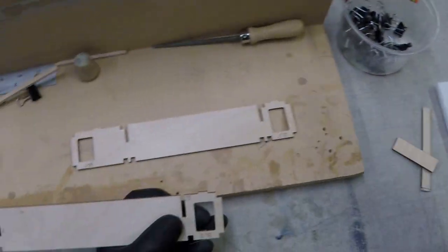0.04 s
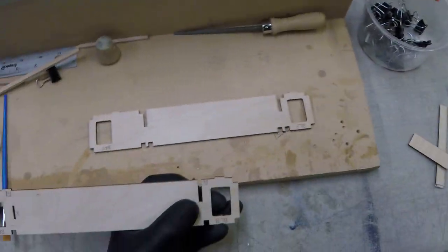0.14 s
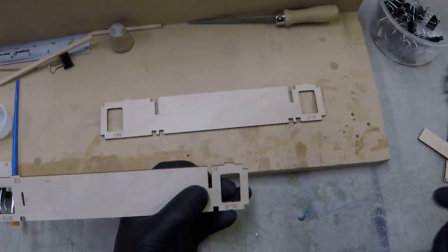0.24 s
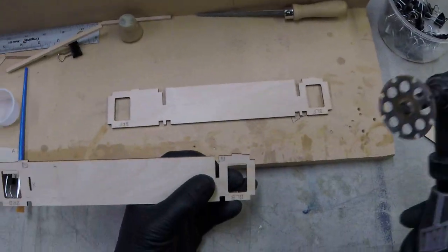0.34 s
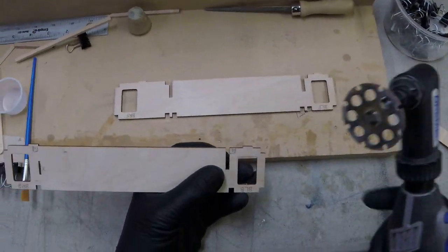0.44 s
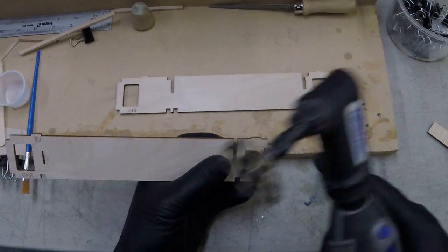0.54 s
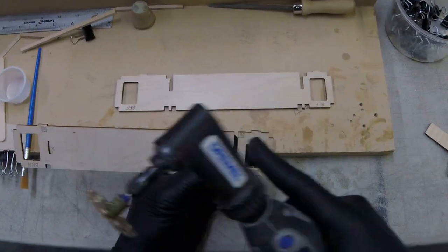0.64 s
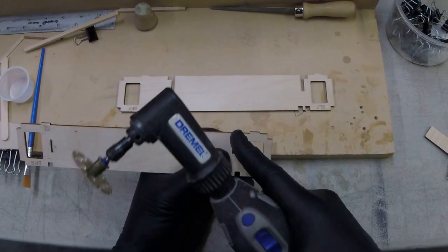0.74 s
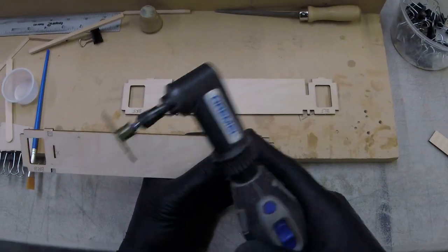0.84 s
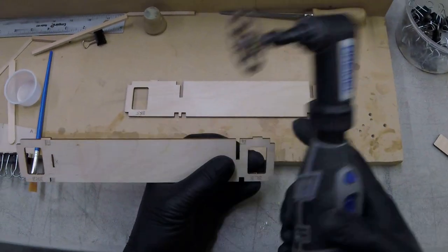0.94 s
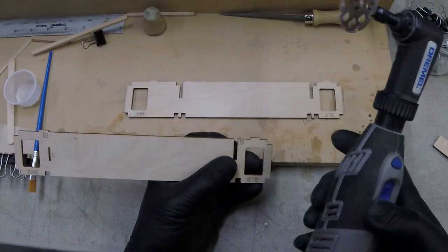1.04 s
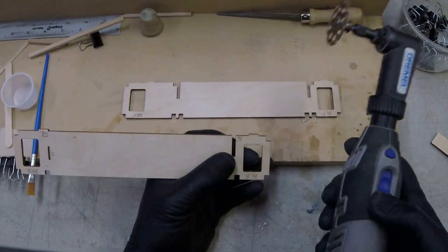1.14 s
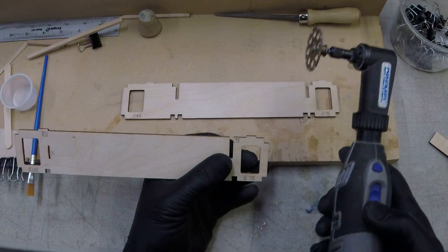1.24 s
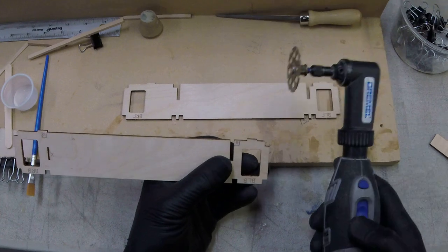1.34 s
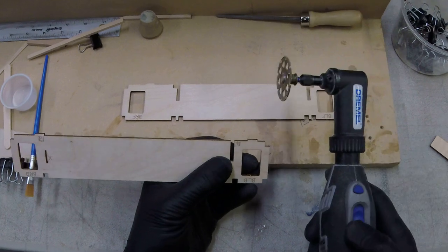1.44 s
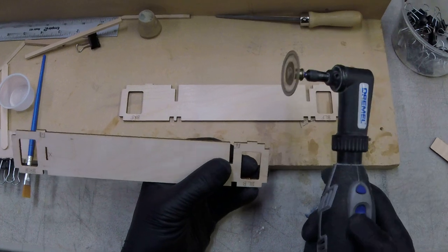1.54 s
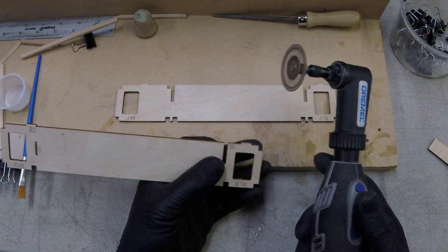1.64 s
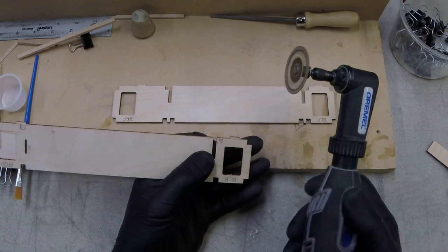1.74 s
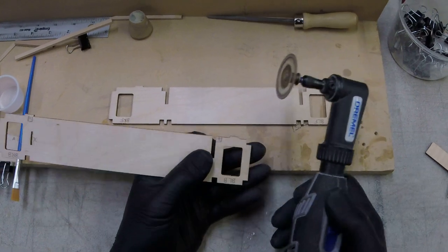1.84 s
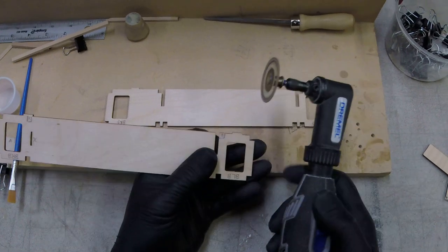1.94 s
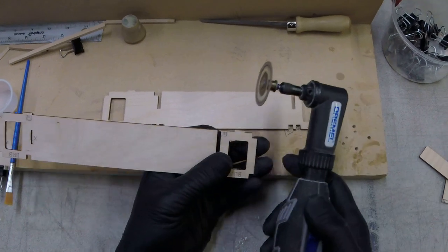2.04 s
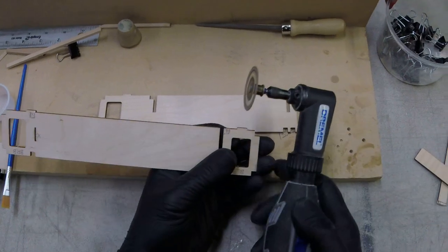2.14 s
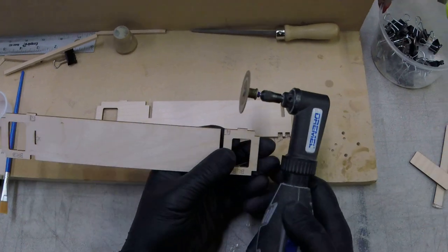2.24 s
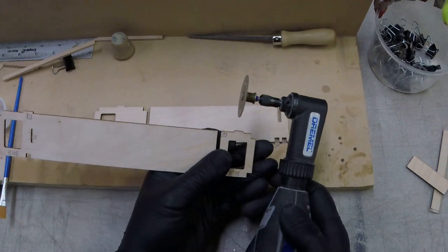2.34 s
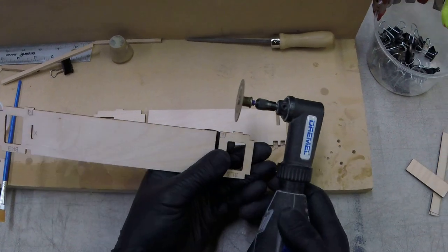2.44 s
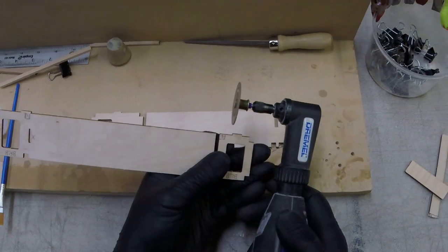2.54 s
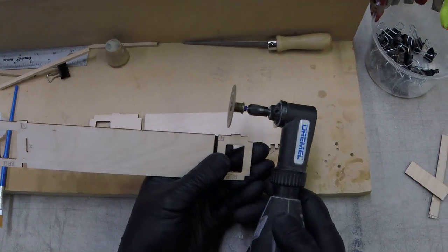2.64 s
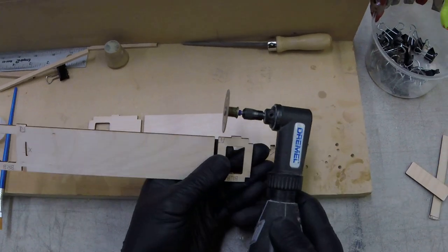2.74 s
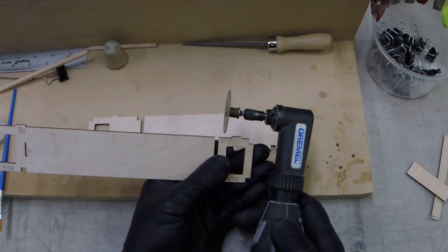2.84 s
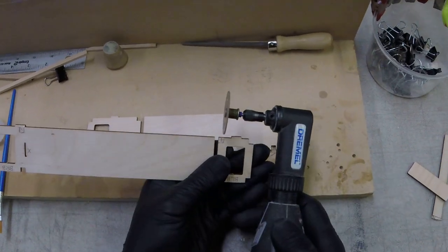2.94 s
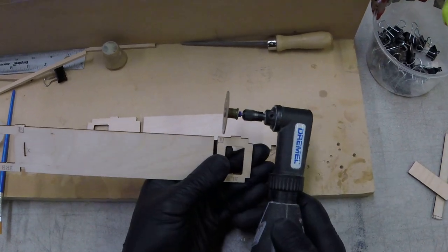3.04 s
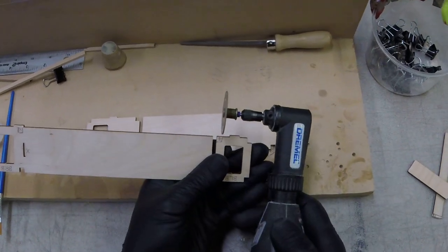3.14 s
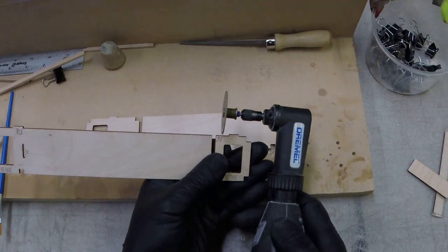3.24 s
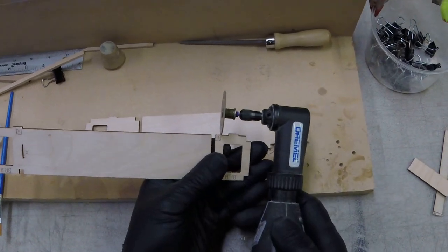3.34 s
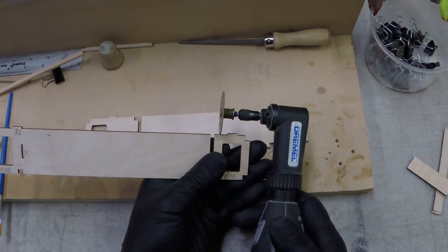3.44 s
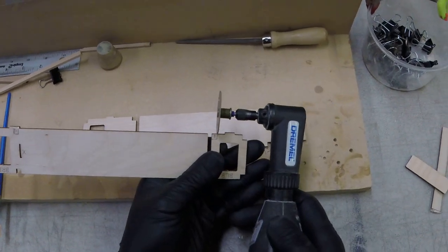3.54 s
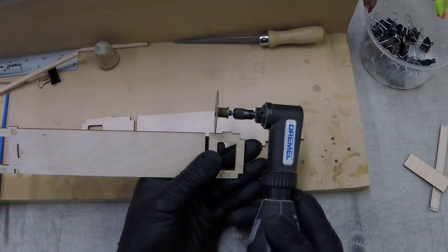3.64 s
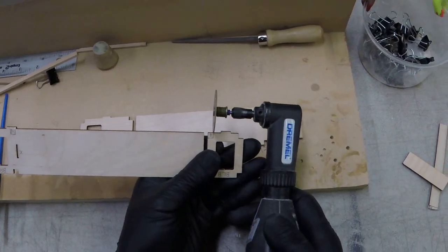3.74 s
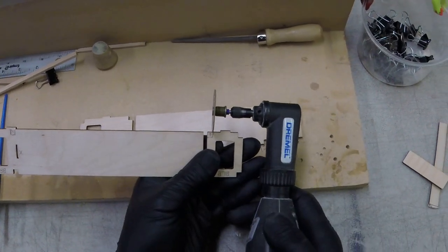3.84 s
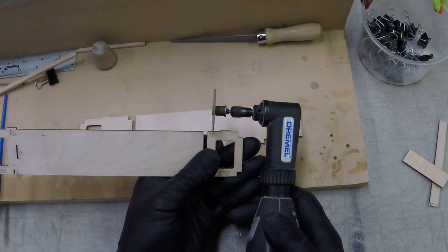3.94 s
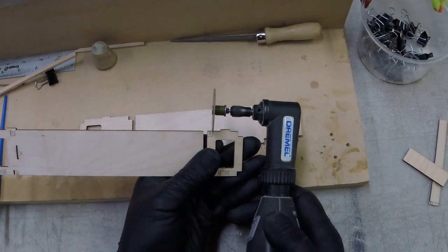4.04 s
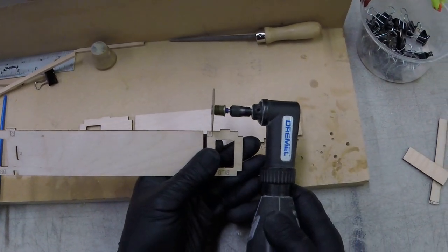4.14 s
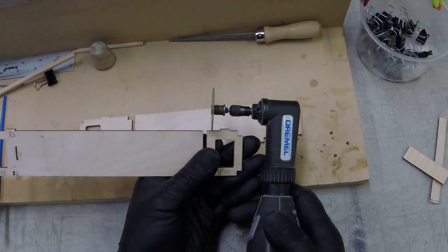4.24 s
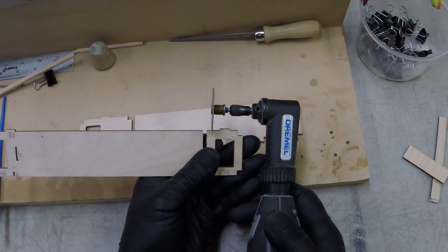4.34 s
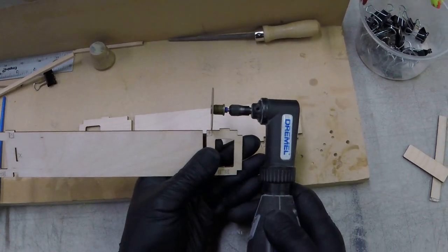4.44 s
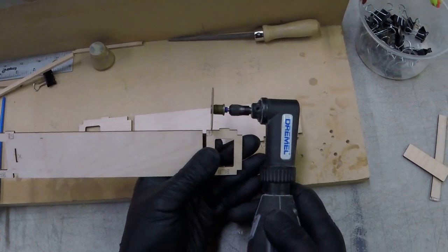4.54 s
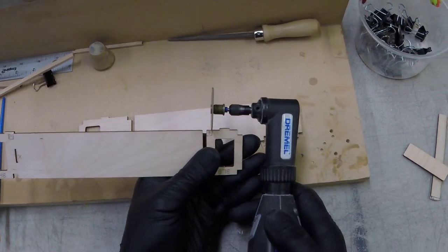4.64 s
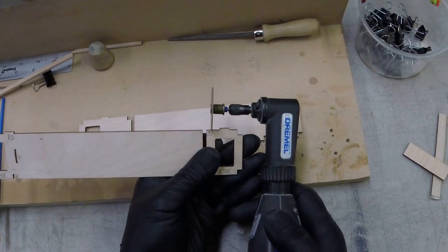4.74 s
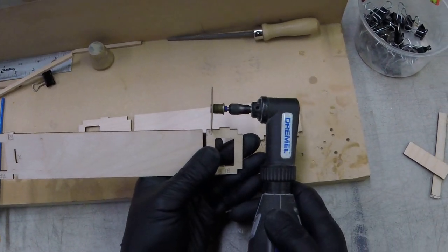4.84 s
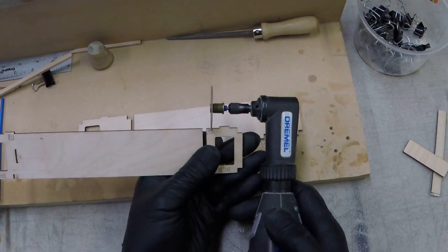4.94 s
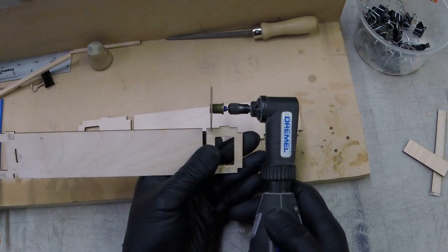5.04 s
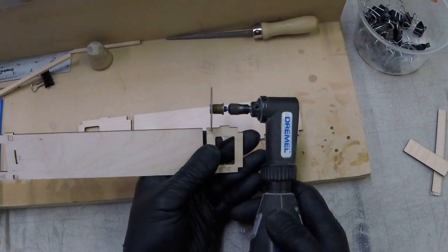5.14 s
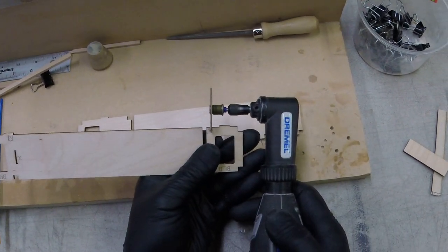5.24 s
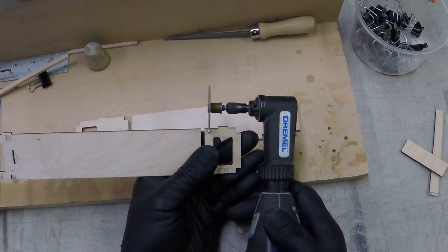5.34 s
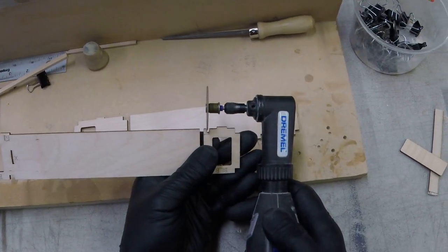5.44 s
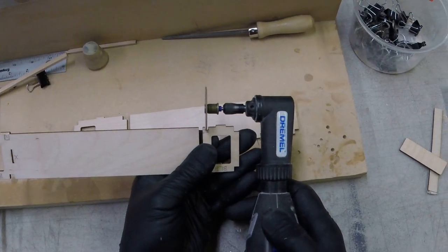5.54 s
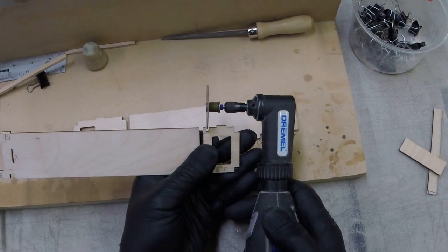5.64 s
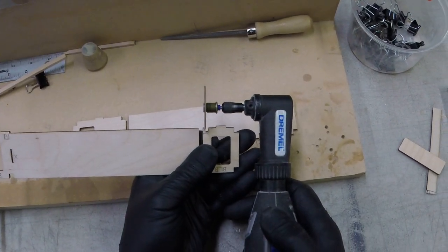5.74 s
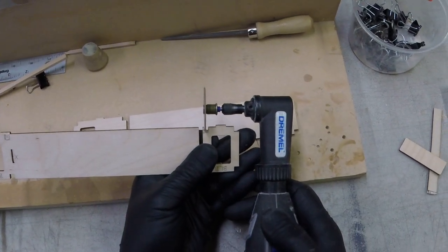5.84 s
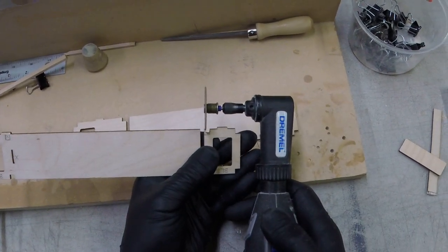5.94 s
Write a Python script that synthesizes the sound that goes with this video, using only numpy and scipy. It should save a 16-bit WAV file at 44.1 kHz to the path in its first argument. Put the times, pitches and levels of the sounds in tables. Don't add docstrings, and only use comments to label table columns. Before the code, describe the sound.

Close in a workshop with a low ventilation drone, gloves and sleeve rustle softly. A plastic slider switch snaps sharply and a small rotary tool winds up with a rising gear whine, settling into a steady rattling buzz and hum. It touches wood lightly, then bites harder. Suddenly everything jumps two octaves, sped up fourfold, as the disc cuts in shrill, wavering strokes. Single close microphone, thin bass, essentially mono.

```python
import sys
import numpy as np
from scipy import signal
from scipy.fft import rfft, irfft, next_fast_len
from scipy.io import wavfile
from scipy.ndimage import uniform_filter1d

SR = 44100
rng = np.random.default_rng(int(sys.argv[2]) if len(sys.argv) > 2 else 0)


def int16_out(signal):
    q = np.round(np.clip(np.atleast_2d(signal).T, -1, 1) * 32767)
    wavfile.write(sys.argv[1], SR, q.astype(np.int16))


def linear_from_db(decibels):
    return 10 ** (np.asarray(decibels, float) / 20)


N = 264159
T = np.arange(N) / SR

CUT_S = 4.8705
TEETH = 17
FULL_HZ = 288
PULL_ENDS_S = 1.903

# [from/s, to/s, level/dB, growth/(dB/s), edge/s, press on the disc/0-1]
KNOCKS = [
    (1.908, 2.88, -24.5, -1.5, .12, 0.44),
    (3.968, 4.18, -31, 1, 0.041, 0.47),
    (4.507, 4.896, -29.5, 16, 0.051, 0.93),
]


def unit(x):
    return x / np.sqrt(np.mean(x ** 2) + 1e-20)


def curves(rows):
    s, *columns = np.transpose(rows)
    return [np.interp(T, s, column) for column in columns]


def wobble(rate):
    knots = int(N * rate / SR) + 2
    return np.interp(T * rate, np.arange(knots), rng.standard_normal(knots))


def spell(start, end, edge):
    return np.clip(np.minimum(T - start, end - T) / edge + .5, 0, 1)


def bump(s, spread):
    return np.exp(-((T - s) / spread) ** 2)


def filtered(x, response):
    size = 2 * next_fast_len(N // 2 + 4096)
    return irfft(rfft(x, size) * response(np.fft.rfftfreq(size, 1 / SR)), size)[:N]


def colour(points, pace=1):
    f, db = np.transpose(points)

    def response(hz):
        gain = linear_from_db(np.interp(np.log(hz + 1), np.log(f * pace), db))
        cepstrum = irfft(np.log(gain + 1e-6))
        cepstrum[1:len(cepstrum) // 2] *= 2
        cepstrum[len(cepstrum) // 2 + 1:] = 0
        return np.exp(rfft(cepstrum))
    return response


def resonances(modes):
    def response(hz):
        total = 0
        for k, (centre, width, db) in enumerate(modes):
            damping = 1j * hz * width
            total = total + (-1) ** k * linear_from_db(db) * damping / (centre * centre - hz * hz + damping)
        return total
    return response


def band(x, lo_hz, hi_hz):
    return unit(filtered(x, lambda hz: 1 / np.sqrt((1 + (lo_hz / (hz + 1)) ** 8) * (1 + (hz / hi_hz) ** 8))))


def shop(pace, line_db):
    # [f/Hz, level/dB per Hz]
    air_colour = [(15, -94), (90, -45), (118, -19.5), (135, -11), (172, -3), (301, -7.5), (394, -13.5),
                  (604, -9), (1150, -21.5), (1630, -21.5), (3540, -34), (5200, -33.5), (7000, -36),
                  (15000, -46.5)]
    # [f/Hz, rms level/dB]
    fan_lines = [(172.3, -51.5), (344.5, -57), (430.7, -66), (511.4, -72), (608.3, -58.5), (694.4, -67),
                 (769.8, -88), (866.7, -84.5)]
    air = unit(filtered(rng.standard_normal(N), colour(air_colour, pace)))
    hum = 0
    for hz, db in fan_lines:
        phase = 2 * np.pi * hz * pace * T + 0.42 * wobble(9 * pace)
        hum = hum + linear_from_db(db + line_db + 2.14 * wobble(13 * pace)) * np.sin(phase)
    return linear_from_db(-48.5 + 0.95 * wobble(3 * pace)) * air + hum


def rumble():
    bass = colour([(20, 2), (60, -1.5), (110, -8.5), (400, -3), (700, -34)])
    return linear_from_db(-76.5 + 4.8 * wobble(4.5)) * unit(filtered(rng.standard_normal(N), bass))


def sleeve_rustle():
    # [t/s, level/dB, spread/s]
    rubs = [
        (.12, -64, 0.025),
        (.31, -72, .03),
        (.57, -62.5, 0.056),
        (.93, -64, .05),
        (1.18, -70, 0.045),
        (1.28, -62, 0.02),
        (1.39, -58, 0.023),
    ]
    # [f/Hz, level/dB per Hz]
    cloth = [(1200, -120), (2000, 2), (4200, -4), (5400, 2), (7000, -8), (10500, -8), (12500, -120)]
    rustle = unit(filtered(rng.standard_normal(N) * linear_from_db(3 * wobble(120)), colour(cloth)))
    return rustle * sum(linear_from_db(db) * np.exp(-.5 * ((T - s) / spread) ** 2) for s, db, spread in rubs)


def slider_switch():
    # [t/s, peak level/dB, t60/s]
    snaps = [
        (.897, -52, .006),
        (.965, -53, .006),
        (1.479, -33, 0.0089),
        (1.4939, -19.5, 0.022),
        (1.5034, -19, 0.0075),
        (1.5061, -11, 0.017),
        (1.515, -23, 0.016),
    ]
    # [f/Hz, width/Hz, level/dB]
    shell = [(1700, 490, -2.5), (3260, 350, 0), (5200, 590, -0.5), (7540, 2800, -13), (10400, 1200, -16)]
    level = 0
    for s, db, t60 in snaps:
        attack = np.clip((T - s) / 0.0016 + 0.67, 0, 1) ** 2
        level = level + attack * linear_from_db(db + 8.0 - 60 * np.abs(T - s) / t60)
    return filtered(rng.standard_normal(N) * level, resonances(shell))


def tightness(turns, tight_db, turn_db, drift):
    luck = np.clip(rng.standard_normal((int(turns[-1]) + 2, 2)), -2, 2)[turns.astype(int)]
    binding = np.cos(2 * np.pi * (turns - .5 + drift * luck[:, 0]))
    return linear_from_db(tight_db * binding + turn_db * luck[:, 1])


def teeth(turns, casing, tight_db, turn_db, tooth_db, surge_db, surge_rate):
    bounces = 2.1
    hit = np.diff(np.floor(turns * TEETH * bounces), prepend=0) > 0
    blows = hit * rng.standard_normal(N) * linear_from_db(tooth_db * np.clip(rng.standard_normal(N), -2, 2))
    blows = blows * tightness(turns, tight_db, turn_db, drift=0.2) * linear_from_db(surge_db * wobble(surge_rate))
    return filtered(blows, casing)


def knock(turns, orders_db, flutter_db, rate, smear, chatter=0):
    total = 0
    for k, db in enumerate(orders_db):
        level = linear_from_db(db + (flutter_db * min(.2 + k / 14, 1) + 3 * chatter) * wobble(rate))
        blur = (smear * (k / 10) ** 2 + k / 4 * chatter) * wobble(rate * 8) + rng.normal()
        total = total + level * np.cos((k + 1) * 2 * np.pi * turns + blur)
    return total * np.sqrt(2)


def imbalance(turns, speed, extra_db, rate):
    # [shaft f/Hz, level/dB]
    handle = [(40, -79), (130, -65), (190, -54), (236, -41), (257, -47.5), (273, -53), (282, -44),
              (293, -42)]
    hz, db = np.transpose(handle)
    level = linear_from_db(np.interp(speed, hz, db) + extra_db + 0.37 * wobble(rate))
    return level * np.sqrt(2) * np.sin(2 * np.pi * turns + 0.4 * wobble(rate))


def bench(x, share):
    delay_s = .000775 + .000012 * wobble(8)
    return (x + share * np.interp(T - delay_s, T, x)) / np.sqrt(1 + share ** 2)


def gear_rattle(turns, speed):
    # [f/Hz, width/Hz, level/dB]
    casing = [(883, 700, -9.5), (1114, 270, 0.5), (1795, 505, -3.5), (2340, 520, -3.5), (3617, 510, 0.5),
              (4690, 270, -1), (5300, 317, 1), (7530, 1520, -12), (8590, 780, -9.5), (10280, 900, -13),
              (13200, 1100, -24)]
    pull = spell(0, PULL_ENDS_S + 0.038, 0.092)
    press = sum(spell(s, end, edge) * share for s, end, *_, edge, share in KNOCKS)
    mid_db = -27 + 1.5 * pull + 1 * press
    mid_db = mid_db + 3.5 * bump(2.41, 0.16) - 4.5 * bump(1.98, 0.11)
    dull_db = -31 + 2.5 * pull + 2.5 * press
    bright_db = -36.5 + 7 * pull + 5 * press
    gear = teeth(turns, resonances(casing), tight_db=2.5, turn_db=1.5, tooth_db=3.0, surge_db=0.5, surge_rate=70)
    gear = gear / np.sqrt(np.abs(uniform_filter1d(gear ** 2, SR // 5)) + 1e-20)
    rattle = linear_from_db(mid_db) * band(gear, 3090, 6360)
    rattle = rattle + linear_from_db(dull_db) * band(gear, 190, 2610)
    rattle = rattle + linear_from_db(bright_db) * bench(band(gear, 8600, 13200), .7 * pull)
    return rattle * (speed / FULL_HZ) ** 0.73 * linear_from_db(0.51 * wobble(12))


def gear_whine(turns, speed):
    # [f/Hz, width/Hz, level/dB]
    head = [(1190, 320, 1.5), (1860, 250, 7), (3030, 220, 4), (3810, 160, 8.5), (5300, 940, 2),
            (6400, 840, -6.5), (8650, 360, -6), (10400, 580, 0), (13600, 650, -17)]
    pace = speed / FULL_HZ
    scatter = pace * (.06 * wobble(300) + .24 * pace * wobble(2500))
    tooth = np.maximum.accumulate(np.floor(turns * TEETH + scatter))
    uneven = linear_from_db(14 * np.clip((pace - .2) / .25, 0, 1) * (tooth % 2) + 1.5 * wobble(1500))
    blows = (np.diff(tooth, prepend=0) > 0) * uneven * tightness(turns, tight_db=6, turn_db=2.0, drift=0.03)
    ring = filtered(blows, resonances(head))
    ring = filtered(ring, colour([(300, -36), (900, 2.5), (3000, 5), (15000, 6.0)]))
    ring = ring / np.sqrt(np.abs(uniform_filter1d(ring ** 2, SR // 12)) + 1e-12)
    past_pull = T - PULL_ENDS_S
    level_db = -23 + 12 * past_pull - 600 * np.maximum(1.54 - T, 0) - 170 * np.maximum(past_pull, 0)
    return linear_from_db(level_db) * ring


def shaft_knock(turns):
    # [multiple, level/dB]
    rising = [(1, -11), (2, -6.5), (3, -13.5), (4, -5.5), (5, -4), (6, -4), (7, -4), (8, -11), (9, -9.5),
              (10, -11), (11, -7), (12, -9), (13, -7), (14, -11), (15, -16), (16, -6), (17, -13), (18, -13),
              (19, -11), (20, -6), (21, -6), (22, -5), (23, 3), (24, -13)]
    # [multiple, level/dB]
    free = [(1, -26), (2, -13), (3, -7), (4, 1.5), (5, -5), (6, -6.5), (7, -5), (8, -10), (9, -8),
            (10, -22), (11, -21), (12, -6), (13, -21), (14, -31), (15, -23), (16, -29), (17, -27), (18, -6),
            (19, -4.5), (20, -2), (21, -8.5), (22, -6), (23, -31), (24, -6)]
    # [multiple, level/dB]
    touch = [(1, -12), (2, -13.5), (3, -5), (4, -4.5), (5, 0), (6, -1.5), (7, -7), (8, -8), (9, -7),
             (10, -15), (11, -9), (12, -8), (13, -14), (14, -21), (15, -12), (16, -12), (17, -1), (18, 0.5),
             (19, -1), (20, -5), (21, -10), (22, -17), (23, -19), (24, 5)]
    # [multiple, level/dB]
    biting = [(1, -15), (2, -16.5), (3, -3), (4, -7), (5, -4), (6, -6), (7, -6.5), (8, -8), (9, -9.5),
              (10, -14), (11, -7), (12, -8), (13, -27), (14, -26), (15, -23), (16, -19), (17, -14),
              (18, -3), (19, 2), (20, 0.5), (21, -3), (22, -10), (23, -30), (24, 6)]
    stages_s = [2.0, 2.2, 3.2, 3.6, 4.55, 4.75]
    orders_db = [-120]
    for k, rows in enumerate(list(zip(rising, free, touch, biting))[1:]):
        a, b, c, d = [db for _, db in rows]
        order_db = np.interp(T, stages_s, [a, b, b, c, c, d])
        if k == 10:
            order_db = order_db + 8 * bump(2.24, .06)
        orders_db.append(order_db - 2.5 * max(k - 18, 0))
    steady = sum(spell(s, end, edge) * linear_from_db(db + grow * (T - s)) for s, end, db, grow, edge, _ in KNOCKS)
    starts_s, settles_s = KNOCKS[0][:2]
    loose_db = np.maximum(-34.5 - 5.5 * np.abs(T - settles_s), -34.5 - 4)
    loose = (T > starts_s) * linear_from_db(loose_db)
    level = np.maximum(steady, loose * linear_from_db(3 * wobble(9))) * linear_from_db(-3)
    return level * knock(turns, orders_db, flutter_db=2.8, rate=20, smear=.5)


def tool():
    # [t/s, f/Hz]
    shaft = [(1.505, 20), (1.54, 45), (1.6, 76.5), (1.7, 124.5), (1.81, 175.5), (1.9, 231), (1.96, 248.5),
             (2.06, 261.5), (2.3, 269), (2.7, 275), (2.9, 276), (2.96, 281.5), (3.3, 289), (3.7, 291.5),
             (4.53, 292.5), (4.87, 276)]
    speed, = curves(shaft)
    turns = np.cumsum(speed * (T > shaft[0][0])) / SR
    running = np.clip((T - 1.514) / 0.0033, 0, 1)
    hum = imbalance(turns, speed, extra_db=0, rate=14)
    return running * (gear_rattle(turns, speed) + gear_whine(turns, speed) + hum) + shaft_knock(turns)


def gear_rattle_fast(turns, gaining, loss_db):
    # [f/Hz, level/dB per Hz]
    casing = [(710, -42), (1200, -30), (1830, -28), (2730, -20), (3400, -10.5), (4600, -4.5), (5570, -4.5),
              (7000, -5.5), (9500, -6), (11600, -9.5), (12600, 2), (14600, 3.5), (15900, 1)]
    freeing = np.clip(gaining, 0, 1.2)
    dull_db = -27.5 + 2.5 * freeing - loss_db
    bright_db = -28.5 - 4 * freeing - loss_db
    gear = teeth(turns, colour(casing), tight_db=0, turn_db=-0.5, tooth_db=1, surge_db=1.0, surge_rate=200)
    late = T > CUT_S
    rattle = linear_from_db(dull_db) * band(gear * late, 1000, 11500) + linear_from_db(bright_db) * band(gear * late, 10000, 18000)
    return np.sqrt(np.mean(late)) * rattle


def shaft_knock_fast(turns, loss_db, chatter):
    # [multiple, level/dB]
    first = [(1, -18), (2, -14), (3, -6.5), (4, -1), (5, -4.5), (6, -10), (7, -8.5), (8, -9), (9, -12.5),
             (10, -14.5), (11, -13), (12, -17), (13, -9), (14, -16), (15, -14)]
    # [multiple, level/dB]
    later = [(1, -14), (2, -12), (3, -8), (4, -1), (5, -5.5), (6, -10.5), (7, -7.5), (8, -12), (9, -12),
             (10, -16), (11, -18), (12, -9), (13, -7), (14, -8), (15, -11)]
    orders_db = [-120] + [np.where(T < 5.3, a, b) for (_, a), (_, b) in zip(first[1:], later[1:])]
    level = linear_from_db(-28 - loss_db - 16 * chatter * np.abs(wobble(140)))
    return level * knock(turns, orders_db, flutter_db=5.5, rate=30, smear=.78, chatter=np.clip(chatter, 0, 1))


def tool_fast():
    # [t/s, f/Hz]
    shaft = [(4.875, 1088), (4.92, 1052), (5.11, 998), (5.3, 980), (5.36, 1090), (5.44, 1176), (5.48, 1138),
             (5.525, 1058), (5.635, 1024), (5.7, 1112), (5.74, 1124), (5.8, 1035), (5.885, 1014),
             (5.96, 1100), (5.99, 1122)]
    # [from/s, to/s, knock loss/dB, chatter/0-1, rattle loss/dB]
    lifts = [
        (5.25, 5.33, 8, .2, 2),
        (5.33, 5.39, 3, .8, 1.5),
        (5.39, 5.445, 9, .8, 3),
        (5.445, 5.49, 4, .15, 0),
        (5.715, 5.75, 3, .1, 0),
        (5.975, 6.05, 4, .2, 0),
    ]
    speed = uniform_filter1d(curves(shaft)[0], int(.025 * SR))
    turns = np.cumsum(speed * (T > CUT_S - .1)) / SR
    gaining = uniform_filter1d(np.gradient(speed) * SR / 1000, SR // 40)
    knock_loss, chatter, rattle_loss = sum(np.outer(row, spell(s, end, 0.017)) for s, end, *row in lifts)
    braking_db = 9.5 * np.clip(-gaining, 0, 1) * (T > lifts[0][0])
    rattle = gear_rattle_fast(turns, gaining, rattle_loss)
    hum = imbalance(turns, speed / 4, braking_db, rate=69)
    return rattle + shaft_knock_fast(turns, knock_loss, chatter) + hum


def side_hiss():
    # [t/s, from f/Hz, to f/Hz, level/dB]
    bursts = [
        (4.929, 5200, 7700, -29),
        (4.93, 10900, 12500, -36),
        (4.953, 4140, 5300, -39),
        (4.953, 9030, 10400, -36),
        (5.278, 4220, 5300, -42),
        (5.627, 10400, 12420, -36),
        (5.79, 8270, 9780, -35),
        (5.79, 10960, 13300, -31),
        (5.905, 9000, 11000, -35),
    ]
    hiss = rng.standard_normal(N)
    total = 0
    for s, lo, hi, db in bursts:
        window = np.cos(np.pi / 2 * np.clip((T - s) / 0.018, -1, 1))
        part = unit(filtered(hiss, lambda hz: (hz > lo) & (hz < hi)))
        total = total + linear_from_db(db) * window * part
    return total


def limited(x):
    return x / (1 + np.abs(x / .62) ** 6) ** (1 / 6)


def microphone(hz):
    return (hz < 15300) / np.sqrt(1 + (110 / (hz + 1)) ** 8)


def scene():
    room = shop(1, line_db=3.5)
    normal = filtered(limited(room + sleeve_rustle() + slider_switch() + tool()), microphone)
    fast = filtered(tool_fast() + shop(4, line_db=2.5), lambda hz: hz < 15850)
    before = np.sin(np.pi / 2 * np.clip((CUT_S - T) / .0016, 0, 1)) ** 2
    after = np.clip((T - CUT_S - .001) / 0.0019, 0, 1)
    return np.tile(before * normal + after * fast + rumble(), (2, 1))


def low_pass(x):
    return signal.sosfilt(signal.butter(12, 16700, fs=SR, output="sos"), x)


def record(dry):
    mix = dry + np.outer([1, -1], side_hiss())
    return low_pass(mix)


dry = scene()
out = record(dry)
int16_out(out)
```